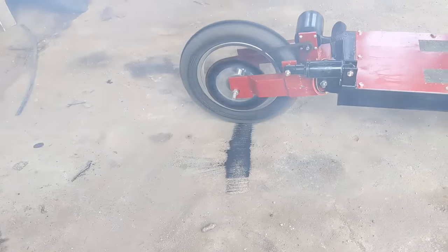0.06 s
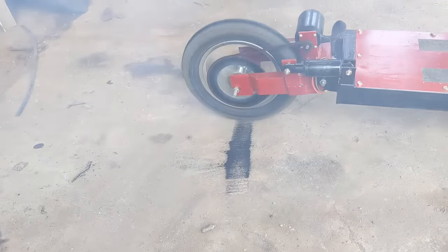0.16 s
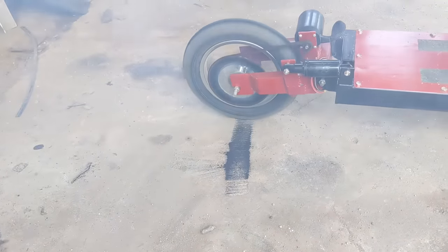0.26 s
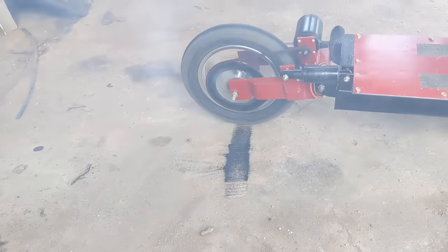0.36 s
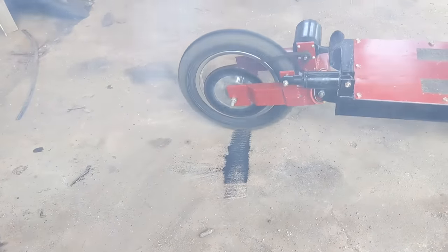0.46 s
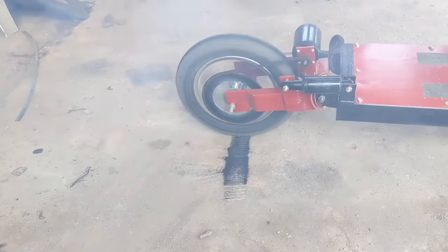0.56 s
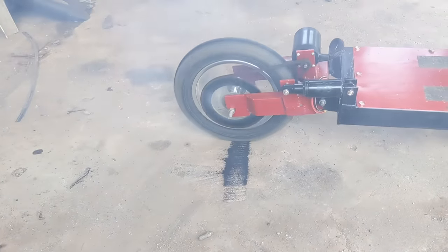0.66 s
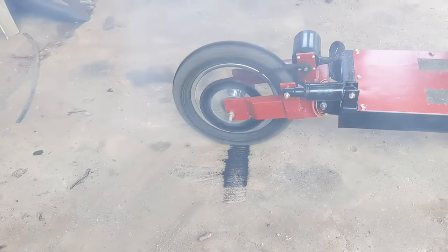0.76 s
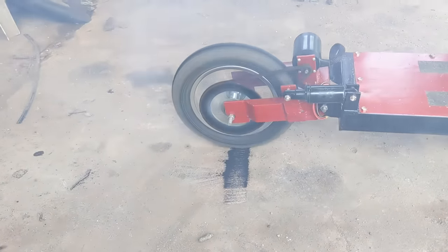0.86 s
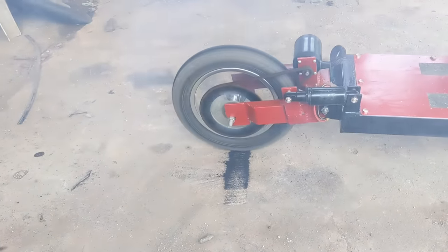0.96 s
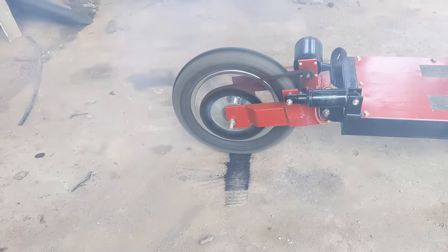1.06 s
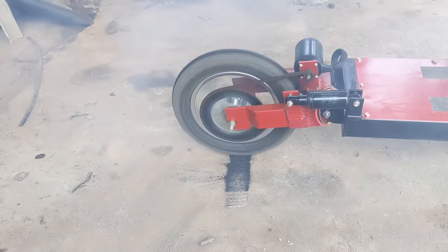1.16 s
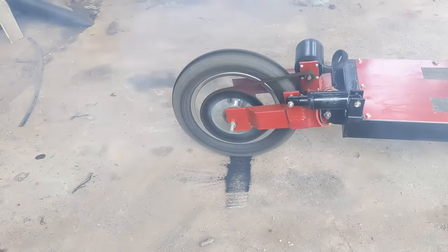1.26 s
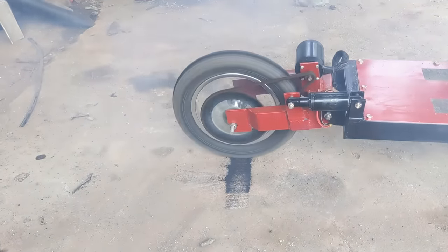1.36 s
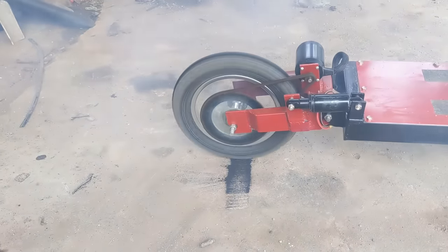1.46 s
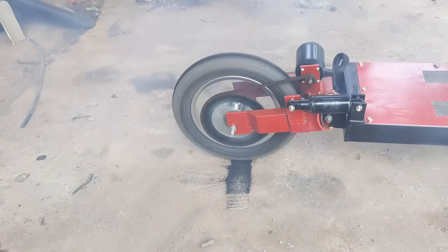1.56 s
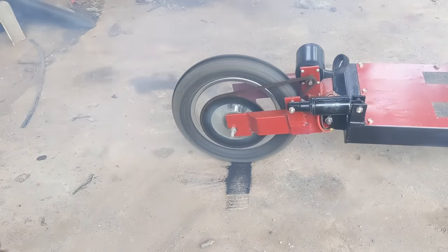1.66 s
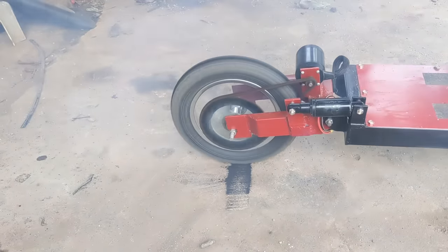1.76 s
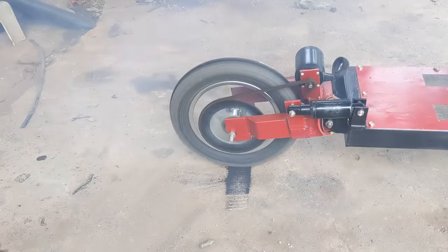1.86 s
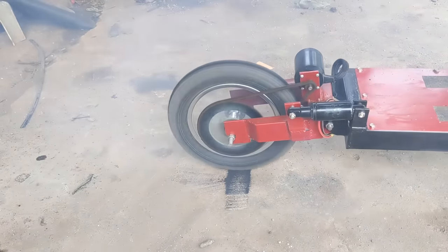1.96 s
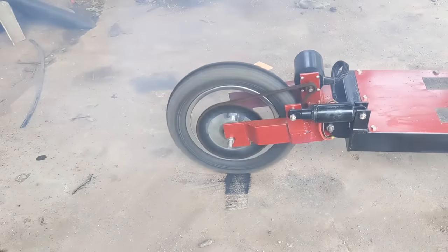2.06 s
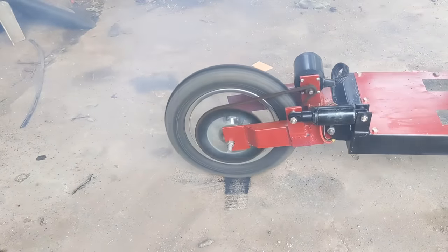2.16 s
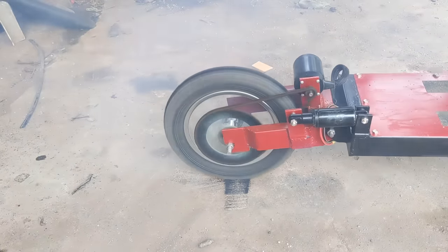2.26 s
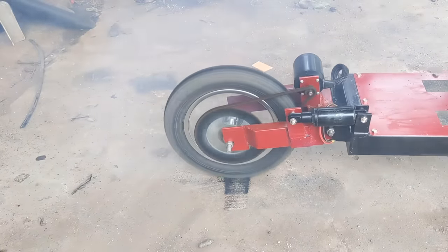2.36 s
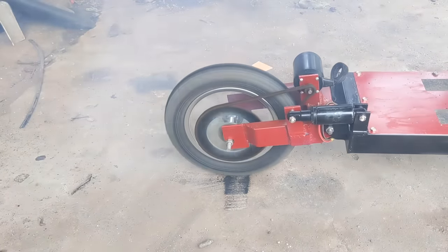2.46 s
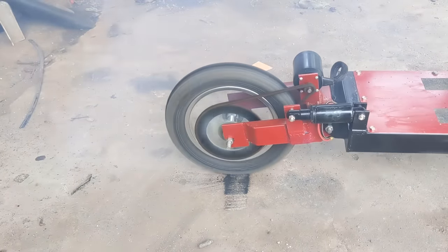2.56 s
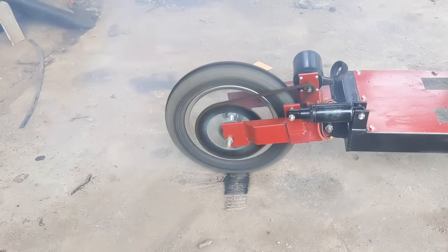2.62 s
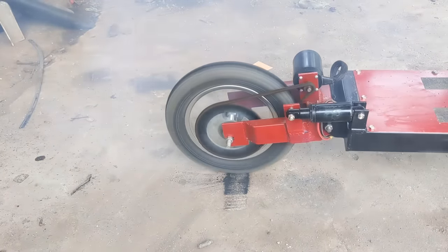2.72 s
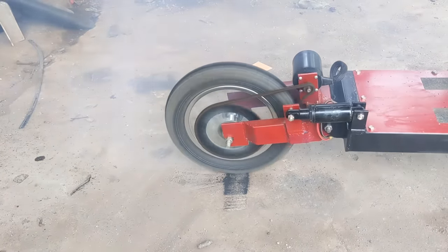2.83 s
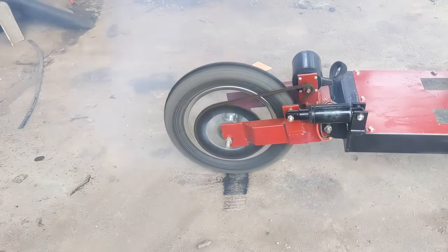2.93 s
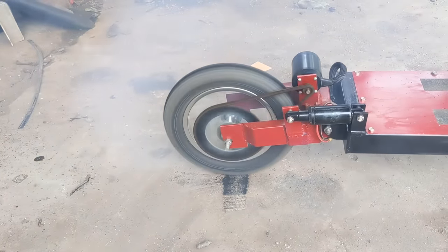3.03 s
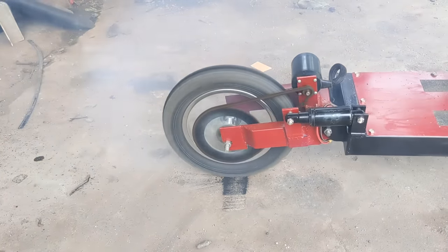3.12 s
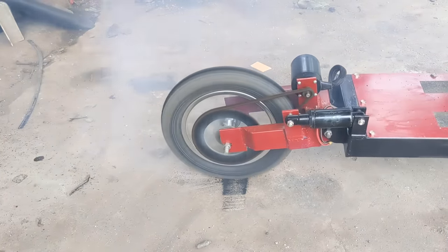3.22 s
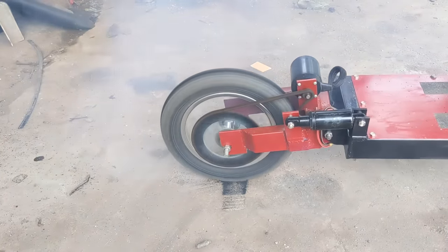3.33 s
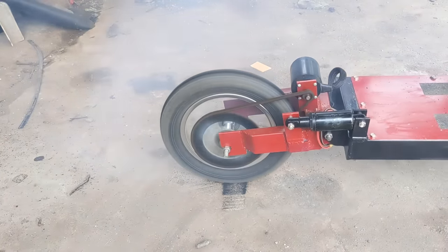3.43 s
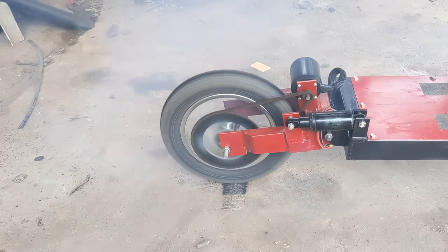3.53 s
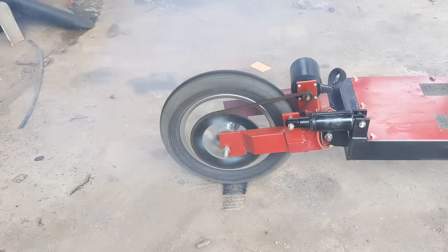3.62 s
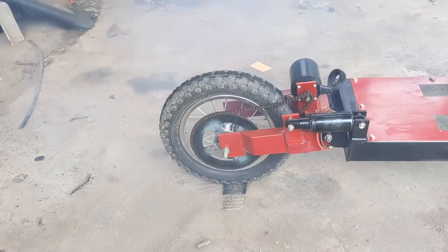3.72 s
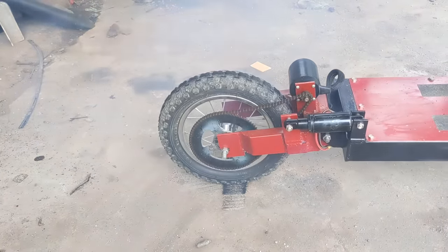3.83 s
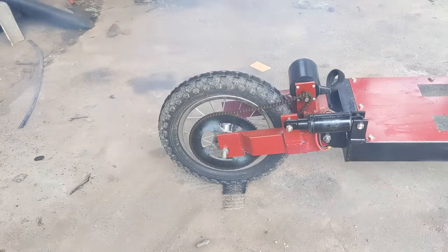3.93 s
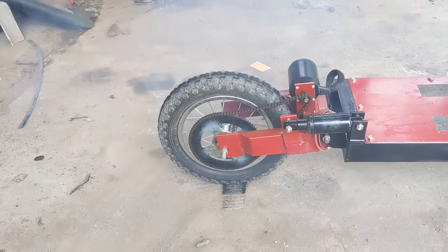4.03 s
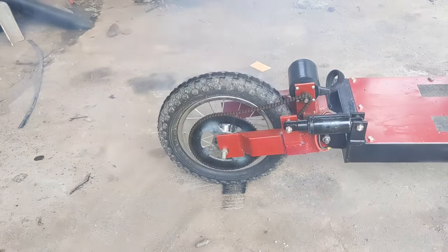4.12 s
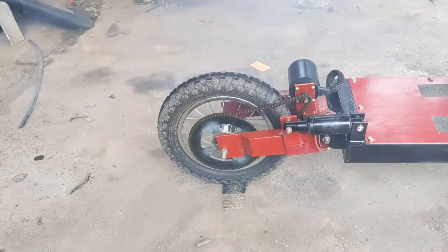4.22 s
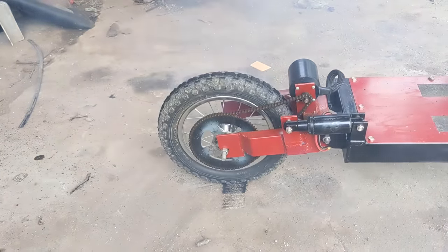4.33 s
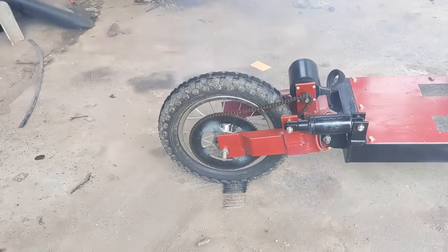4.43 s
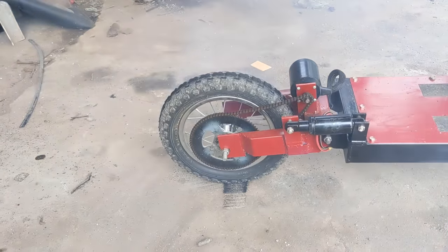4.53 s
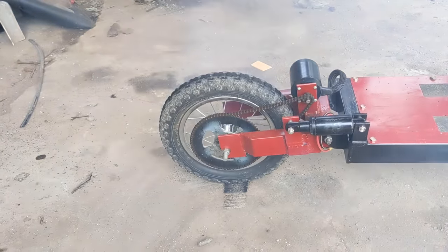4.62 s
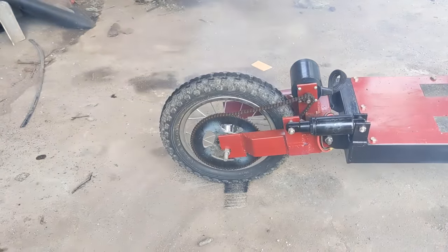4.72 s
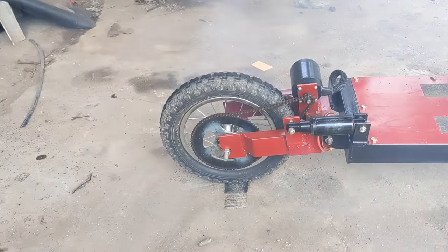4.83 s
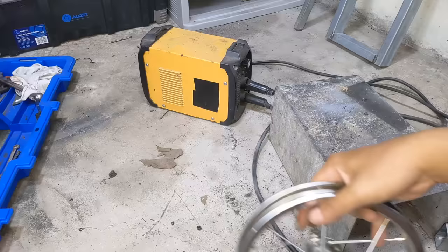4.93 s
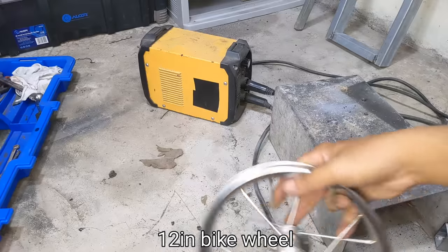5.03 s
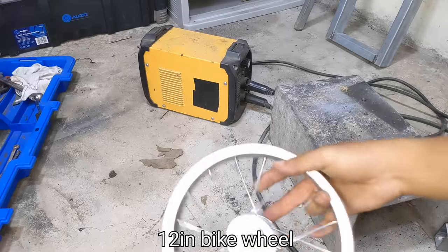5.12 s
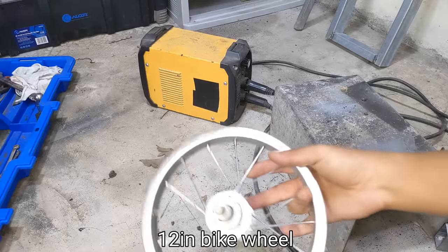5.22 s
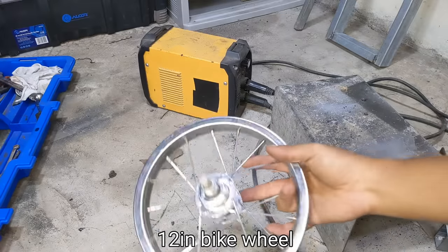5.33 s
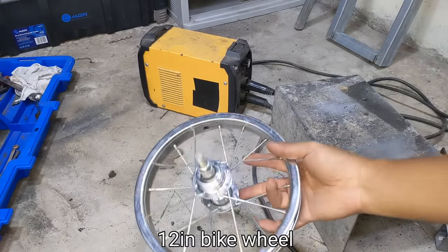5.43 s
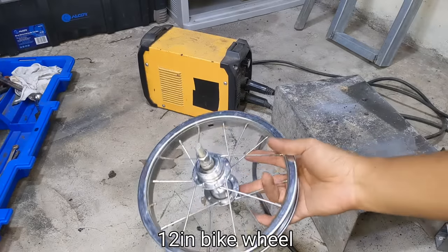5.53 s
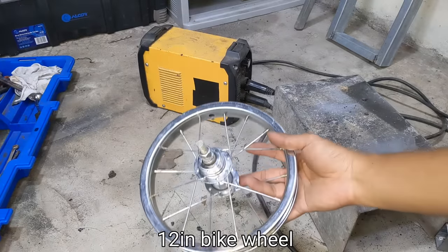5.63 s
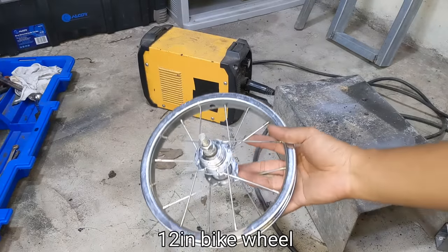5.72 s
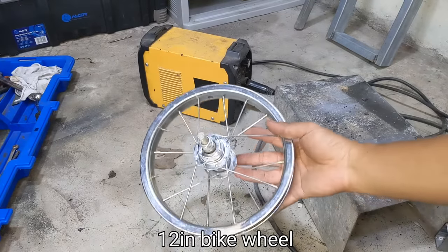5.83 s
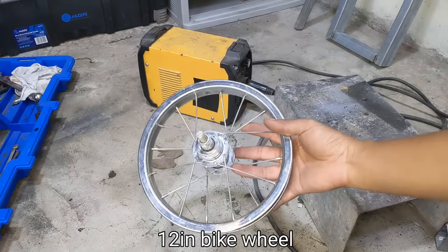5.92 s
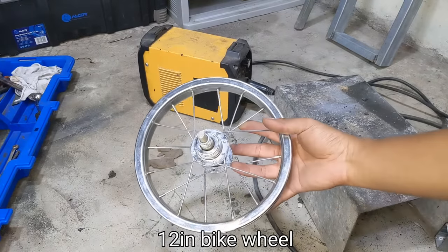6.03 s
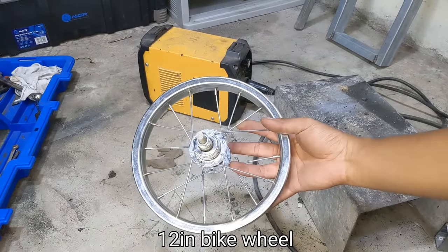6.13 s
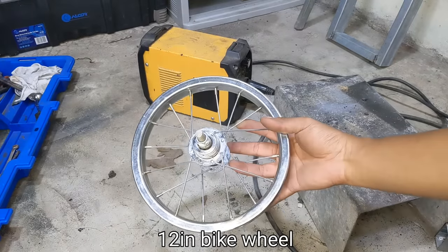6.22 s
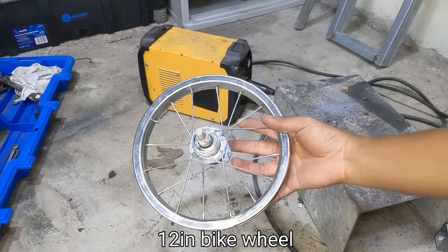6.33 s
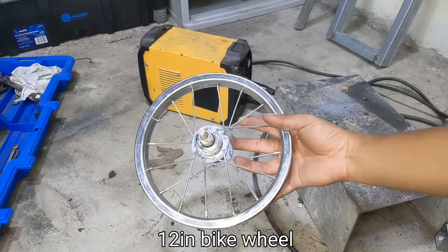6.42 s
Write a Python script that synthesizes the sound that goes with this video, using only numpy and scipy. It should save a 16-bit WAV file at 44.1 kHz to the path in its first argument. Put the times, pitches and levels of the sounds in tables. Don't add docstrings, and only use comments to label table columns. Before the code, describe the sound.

A loud, rough electric whine with dense treble hiss fills the first three and a half seconds, fluttering as chain tension and tyre grip change. The wheel stops in under half a second, pitch sinking. Quiet outdoor rumble and sparse far chirps follow. A hard cut leads to a small workshop, slightly right, with low fan drone, soft air and four short dull rim taps.

```python
import sys
import numpy as np
from scipy import signal
from scipy.fft import rfft, irfft, next_fast_len
from scipy.io import wavfile
from scipy.ndimage import uniform_filter1d

SR = 44100
rng = np.random.default_rng(int(sys.argv[2]) if len(sys.argv) > 2 else 0)


def put_to_file(sound):
    columns = np.atleast_2d(sound).T
    safe = np.clip(columns, -1, 1)
    whole_steps = np.round(safe * 32767)
    wavfile.write(sys.argv[1], SR, whole_steps.astype(np.int16))


def volts(x):
    e = np.asarray(x, float) / 20
    return 10 ** e


N = 285768
T = np.arange(N) / SR
YARD_ENDS_S, WORKSHOP_STARTS_S = 4.967, 5.0005


def unit(x):
    return x / np.sqrt(np.mean(np.abs(x) ** 2) + 1e-20)


def along(points, hz):
    f, v = np.transpose(points)
    return np.interp(np.log(hz + 1), np.log(f + 1), v)


def curves(rows):
    s, *cols = np.transpose(rows)
    return [np.interp(T, s, c) for c in cols]


def wobble(rate):
    return np.interp(T * rate, np.arange(4000), rng.standard_normal(4000))


def swell(s, db, half_s):
    return db * np.exp(-((T - s) / half_s) ** 2)


def sides(db):
    return volts(np.array([db / 2, -db / 2]))


def filtered(x, response):
    m = next_fast_len(N + 8192)
    return irfft(rfft(x, m) * response(np.fft.rfftfreq(m, 1 / SR)), m)[..., :N]


def rush(spectrum, alike, patchy_db, lead_s=0):
    z = signal.stft(rng.standard_normal((2, N)), nperseg=512)[2]
    field = uniform_filter1d(rng.standard_normal(z.shape[1:]), size=6, axis=0)
    field = uniform_filter1d(field, size=12, axis=1)
    pair = signal.istft(z * volts(patchy_db * unit(field)), nperseg=512)[1][:, :N]

    def mid_side(hz):
        turn = np.arccos(np.clip(along(alike, hz), -1, 1)) / 2
        return volts(along(spectrum, hz)) * [np.cos(turn), np.sin(turn)]

    def lead(hz):
        return np.exp(1j * np.pi * hz * lead_s * np.array([[1], [-1]]))

    mid, side = filtered(pair, mid_side)
    return unit(filtered(np.array([mid + side, mid - side]), lead))


def orders(turns, teeth, table, levels_db, uneven, fade_db):
    out = np.zeros((2, N))
    for (k, left_db, right_db, blur_hz, blur_db), level_db in zip(table, levels_db):
        for c, db in enumerate((left_db, right_db)):
            blur = volts(blur_db - 3.0) * (wobble(blur_hz) + 1j * wobble(blur_hz)) if c == 0 else blur
            contact = (1 + blur) * (1 + (uneven - 1) / max(k - 1, 1)) * np.exp(2j * np.pi * k * teeth * turns)
            path = np.exp(1j * (0.52 * c * k + 0.33 * min(k, 4) * wobble(20)))
            gain = volts(db + level_db + (k > 3) * fade_db * wobble(1.99))
            out[c] += np.sqrt(2 / (1 + volts(2 * blur_db))) * gain * np.real(contact * path)
    return out


def pattern(turns, sidebands):
    return 1 + sum(volts(db) * np.exp(2j * np.pi * (k * turns + rng.random())) for k, db in sidebands)


# time in seconds, wheel turns per second.
SPEED = [(0.0, 25.15), (0.375, 24.48), (0.625, 23.29), (0.875, 22.31), (1.125, 22.6), (1.375, 22.84),
         (1.75, 23.99), (1.875, 24.1), (2.0, 24.04), (2.25, 23.02), (2.375, 22.91), (2.625, 22.98),
         (2.75, 22.86), (3.0, 23.05), (3.25, 23.38), (3.375, 23.47), (3.56, 23.2)]


def wheel_motion():
    brake_s, brake_turns_per_s2 = 3.578, 50
    powered, = curves(SPEED)
    speed = np.maximum(powered - brake_turns_per_s2 * np.maximum(T - brake_s, 0), 1)
    turns = np.cumsum(speed) / SR
    slowed_db = 20 * np.log10(speed / powered)
    return powered, turns, slowed_db


def braking_howl():
    return swell(3.725, 13.8, 0.037)


def overtones_db(slowed_db):
    return 0.5 + 4.5 * slowed_db


# multiple of the tooth rate, left level in dB, right level in dB,
# blur in Hz, blur share in dB.
CHAIN_TONES = [(1, -33, -35.5, 33, -12), (2, -32, -42, 55, -7), (3, -31, -30, 130, 5),
               (4, -34.5, -30.5, 80, 14), (5, -36.5, -34, 58, 4), (6, -41.5, -37, 42, 29),
               (7, -46.5, -34.5, 71, 6), (8, -43, -42, 220, -1), (10, -46, -39.5, 120, -7)]
# time in seconds, rise in dB, half length in seconds.
SLACK_SLAPS = [(0.05, 1, 0.13), (1.97, 4.5, 0.09), (2.38, 6, 0.074), (2.64, 6, 0.11), (2.94, 5, 0.047),
               (3.38, 3.5, 0.11)]


def chain_whine(powered, turns, slowed_db, tension_db):
    guard_hz, guard_width_hz = 1669.5, 49
    second_db = -13.5 + 16.5 / (1 + ((72 * powered - guard_hz) / guard_width_hz) ** 2) + 1.2 * slowed_db
    second_db += 1.5 * (T - 2)
    second_db += swell(3.66, 4.6, 0.036)
    third_db = 2.5 + 2 * (powered - 23) + 1.2 * slowed_db
    third_db += braking_howl() + sum(swell(*row) for row in SLACK_SLAPS)
    sidebands = zip((-8, -4, -3, -2, -1, 1, 2, 3, 4), (-14, -12, -17, -17, -12, -14, -16, -18, -13))
    levels_db = [tension_db, second_db, third_db] + [overtones_db(slowed_db)] * 6
    return orders(turns, 36, CHAIN_TONES, levels_db, uneven=pattern(turns, sidebands), fade_db=7.0)


# multiple of the knob-pair rate, left level in dB, right level in dB,
# blur in Hz, blur share in dB.
TREAD_TONES = [(2, -34.5, -36, 70, -4), (3, -35, -34.5, 68, -16), (4, -34, -42, 60, -3),
               (6, -33, -38, 97, 3), (8, -34.5, -29, 130, 5.5), (9, -33.5, -29, 110, 5),
               (10, -31.5, -30, 96, -3.5), (12, -30.5, -57, 400, 12.5), (14, -25.5, -30, 900, 18)]


def tread_song(turns, slowed_db, grip_db):
    sidebands = zip((-3, -2, -1, 1, 2), (-14, -13, -13, -12, -14))
    second_row_db = 0.5 + 0.7 * braking_howl() + 1.2 * slowed_db
    levels_db = [grip_db, second_row_db] + [overtones_db(slowed_db)] * 7
    tread = orders(turns, 39, TREAD_TONES, levels_db, uneven=pattern(turns, sidebands), fade_db=1.5)
    return tread * sides(2 + 3 * wobble(7.15))


# centre in Hz, width in Hz, level in dB.
DECK_RINGS = [(1772, 92, 1), (6680, 700, 8.5), (9100, 1200, -2.5)]


def through_deck(tones):
    def response(f):
        deck = 1 + sum(volts(db) * 1j * f * w / (c * c - f * f + 1j * f * w) for c, w, db in DECK_RINGS)
        floor_dip = 1 - 0.27 * np.exp(-((f - 3873) / 340) ** 2)
        return deck * floor_dip
    return filtered(tones, response)


# frequency in Hz, density in dB per Hz.
RUBBER = [(2240, -85), (3800, -17), (4480, -13), (4760, -11.5), (5220, -7.5), (5850, -8), (6530, -1.5),
          (9020, -4), (10100, -11.5), (12700, -7), (15300, -14), (16000, -17), (16300, -85)]
# frequency in Hz, left-right difference in dB.
RUBBER_SIDE = [(60, 1.5), (110, -18), (200, -3), (380, -4.5), (700, -5), (1290, -0.5), (2380, 1.5),
               (4400, 6.5), (8120, 0.5), (15000, 17)]
# frequency in Hz, likeness from 0 to 1.
WHEEL_ALIKE = [(60, 0.82), (130, 0.89), (290, 0.41), (640, 0.6), (1410, 0.2), (3100, 0.59), (6820, 0.17),
               (15000, 0.0098)]


def rubber_hiss():
    return filtered(rush(RUBBER, WHEEL_ALIKE, patchy_db=0.5), lambda hz: sides(along(RUBBER_SIDE, hz)))


# frequency in Hz, density in dB per Hz.
LINKS = [(240, -46), (400, -15), (602, -23), (852, -13.5), (1490, -11.5), (1780, -3.5), (2090, -14.5),
         (2540, -6), (3600, -14.5), (3790, -29), (4600, -15.5), (5980, -62.5), (10100, -120)]


def link_rattle(slowed_db):
    level_db = -9.5 + 4 * np.clip(-slowed_db / 4, 0, 1) + 1.4 * wobble(6.04)
    return volts(level_db) * rush(LINKS, WHEEL_ALIKE, patchy_db=2.5)


# time in seconds, rubbing level in dB, left-right difference in dB
# as the camera sways, chain tension in dB, tread grip in dB.
LOAD = [(0.0, -16, -4.5, -8.5, 5.5), (0.42, -16.5, -5.5, 2.5, 5.5), (0.75, -17.5, -9.5, -7.5, -0.5),
        (1.0, -17, -7, -6.5, 1), (1.26, -17, -9, -2, 4), (1.45, -15, -4.5, -5.5, 3), (1.68, -17, -7, 1, 5),
        (1.9, -14, -6, 3, -8), (2.12, -16, -7.5, -0.5, 6.5), (2.28, -14, -5.5, -5, -1),
        (2.5, -16.5, -7.5, -3, 5), (2.8, -15.5, -5.5, -1.5, -7), (3.0, -16, -6.5, -8.5, 2.5),
        (3.22, -16, -6, -1, 6.5), (3.6, -15.5, -8, -4, 2), (3.8, -20.5, -11.5, -13, -8),
        (3.94, -48.5, -6, -22, -22.5)]


def scooter():
    powered, turns, slowed_db = wheel_motion()
    hiss_db, pan_db, tension_db, grip_db = curves(LOAD)
    chain = chain_whine(powered, turns, slowed_db, tension_db)
    tread = tread_song(turns, slowed_db, grip_db)
    tones = volts(1.0 + 0.8 * np.minimum(hiss_db + 17.5, 0)) * through_deck(chain + tread)
    shaft_beat_db = np.cos(2 * np.pi * 4 * turns)
    grit_db = 0.12 * wobble(14) + 0.25 * wobble(40) + 1.4 * wobble(600)
    rubber = volts(hiss_db - 0.5) * sides(pan_db) * rubber_hiss()
    links = volts(hiss_db) * link_rattle(slowed_db)
    running = np.clip((3.98 - T) / 0.081, 0, 1)
    return running * (tones + volts(shaft_beat_db + grit_db) * (rubber + links))


# frequency in Hz, density in dB per Hz.
YARD_DEEP = [(15, -68), (25, -45), (47, -10), (59, -7), (123, -2.5), (150, -5), (200, -37), (330, -120)]
YARD_LOW = [(82, -34), (140, -6.5), (205, 1.5), (232, -0.5), (317, -1), (356, -2.5), (426, -10), (534, -12),
            (605, -12.5), (644, -35), (900, -18), (1170, -57.5), (1980, -120)]
# time in seconds, rise in dB, half length in seconds.
PASSES = [(1.1, 3, 0.092), (1.83, 6.5, 0.47), (2.947, 3, 0.079), (3.28, 5, 0.07), (3.866, 5, 0.28),
          (4.9, 4, 0.35)]
# frequency in Hz, likeness from 0 to 1.
ROOM_ALIKE = [(100, 0.95), (500, 0.84), (2000, 0.25), (8000, 0.098)]


def yard_rumble():
    drone_db = -38.5 + sum(swell(*row) for row in PASSES) + 0.48 * wobble(12)
    rumble = volts(-40 + 0.2 * wobble(5)) * rush(YARD_DEEP, ROOM_ALIKE, patchy_db=1)
    rumble += volts(drone_db) * rush(YARD_LOW, ROOM_ALIKE, patchy_db=-0.8)
    rumble += volts(-43.5 + 2.5 * wobble(5.4)) * np.sin(2 * np.pi * 318 * T + 1.0 * wobble(9.3))
    return rumble * sides(np.array([1.5]))


# frequency in Hz, density in dB per Hz.
YARD_HIGH = [(410, -31), (700, -3), (882, -12), (1200, -8.5), (1300, -9.5), (1650, -14.5), (1720, -12),
             (3100, -15), (5310, -23.5), (7410, -18.5), (9700, -33), (15000, -40)]


def yard_air():
    level_db = -43 + swell(4.85, 2.5, 0.12)
    return volts(level_db) * rush(YARD_HIGH, ROOM_ALIKE, patchy_db=1, lead_s=0.00027) * sides(np.array([1.8]))


# start in seconds, peak in dB, pitch in Hz, length in seconds.
BIRDS = [
    (4.227, -44, 3140, 0.011),
    (4.2594, -54, 3180, 0.012),
    (4.315, -45, 3110, 0.013),
    (4.504, -46, 3000, 0.012),
    (4.687, -45, 3270, 0.01),
    (4.771, -36.5, 3100, 0.0089),
    (4.806, -45, 2920, 0.012),
    (4.8394, -57, 2940, 0.012),
]


def birds():
    chirps = np.zeros((2, N))
    flutter = 1.7 * np.array([wobble(150), wobble(140)])
    for s, db, hz, length_s in BIRDS:
        u = np.maximum(T - s, 0) / length_s
        chirps += volts(db + 9.0) * u * np.exp(-u) * np.sin(2 * np.pi * hz * T + flutter)
    return chirps


# frequency in Hz, level in dB.
FAN = [(107.7, -46), (156.1, -36), (236.9, -44.5), (274.5, -61), (430.7, -49), (473.7, -55), (667.5, -53),
       (706, -54.5)]


def fan_hum():
    level_db = 8 - 4.5 * (T - WORKSHOP_STARTS_S) + swell(5.0, -1, 0.03) + swell(5.1, -3.5, 0.13)
    fan = 0
    for hz, db in FAN:
        fan += volts(db + (0.5 + hz / 250) * wobble(8.9)) * np.sin(2 * np.pi * hz * T + 1.8 * wobble(7))
    return volts(level_db) * fan


# frequency in Hz, density in dB per Hz.
SHOP_LOW = [(35, -36), (60, -9.5), (107, -11.5), (156, -12.5), (199, -12), (244, -12), (285, -15.5),
            (383, -18), (424, -20), (608, -17.5), (692, -17.5), (777, -21), (907, -19.5), (1300, -26.5),
            (1690, -41), (2860, -120)]
SHOP_HIGH = [(530, -54), (900, -8.5), (1500, -8.5), (2420, -12), (2630, -14.5), (5310, -20.5), (6980, -20),
             (10800, -27), (14400, -34), (15500, -40.5)]


def shop_room():
    drone = volts(-35.5 + 0.69 * wobble(4.3)) * rush(SHOP_LOW, ROOM_ALIKE, patchy_db=0.5, lead_s=0.00027)
    air = volts(-44.5 + swell(5.05, 0.94, 0.1)) * rush(SHOP_HIGH, ROOM_ALIKE, patchy_db=0.6, lead_s=0.00036)
    thrum_db = -42 - 11 * np.clip((5.53 - T) / 0.3, 0, 1) + swell(6.22, 11, 0.09)
    thrum_spectrum = [(20, -120), (30, -38), (53, 3), (70, -18), (90, -120)]  # (Hz, dB per Hz)
    return drone + air + volts(thrum_db) * rush(thrum_spectrum, ROOM_ALIKE, patchy_db=5.0)


# start in seconds, peak in dB, pitch in Hz.
TAPS = [
    (5.016, -38, 600),
    (5.354, -35, 627),
    (5.459, -28, 546),
    (5.563, -22.5, 522),
]


def rim_taps():
    taps = 0
    for s, db, hz in TAPS:
        taps += volts(db - 60 * abs(T - s) / 0.012) * (T > s) * np.sin(2 * np.pi * hz * (T - s))
    return taps


def scene():
    yard = scooter() + yard_rumble() + yard_air() + birds()
    workshop = (fan_hum() + rim_taps() + shop_room()) * sides(np.array([-2.3]))
    return (T < YARD_ENDS_S) * yard + (T > WORKSHOP_STARTS_S) * workshop


# frequency in Hz, level in dB relative to the 6-9 kHz hiss.
MASK = [(1850, -38), (2100, -11), (4700, -10), (5600, -13.5), (8000, -23), (10200, -11), (15300, -20),
        (15750, 0)]


def masked(x):
    hz, _, z = signal.stft(x, SR, window="cosine", nperseg=2048)
    power = np.abs(z.mean(axis=0)) ** 2
    bands = np.repeat(power[:1024].reshape(128, 8, -1).mean(axis=1), 8, axis=0)
    hiss = power[(hz > 6000) & (hz < 9000)].mean(axis=0)
    z[:, :1024] *= bands > hiss * volts(2 * along(MASK, hz[:1024]))[:, None]
    return signal.istft(z, SR, window="cosine", nperseg=2048)[1][:, :N]


def top_cut(x):
    return signal.sosfilt(signal.butter(12, 16430, fs=SR, output="sos"), x)


def record(dry):
    limited = dry / (1 + np.abs(dry) ** 10) ** 0.1
    mix = masked(limited) * ((T < YARD_ENDS_S) | (T > WORKSHOP_STARTS_S))
    return top_cut(mix)


dry = scene()
out = record(dry)
put_to_file(out)
```